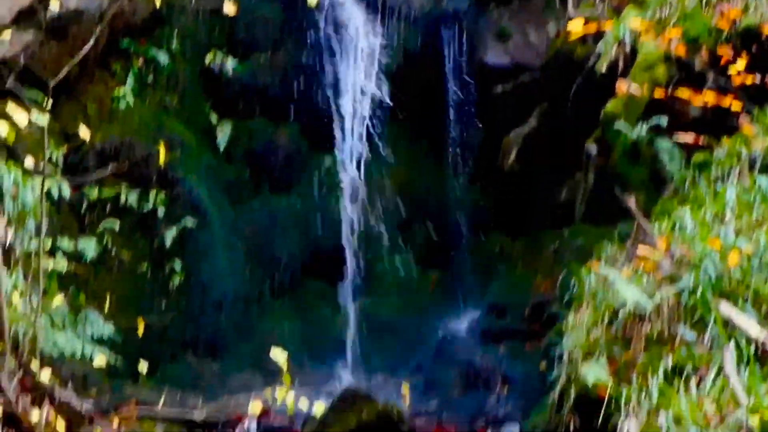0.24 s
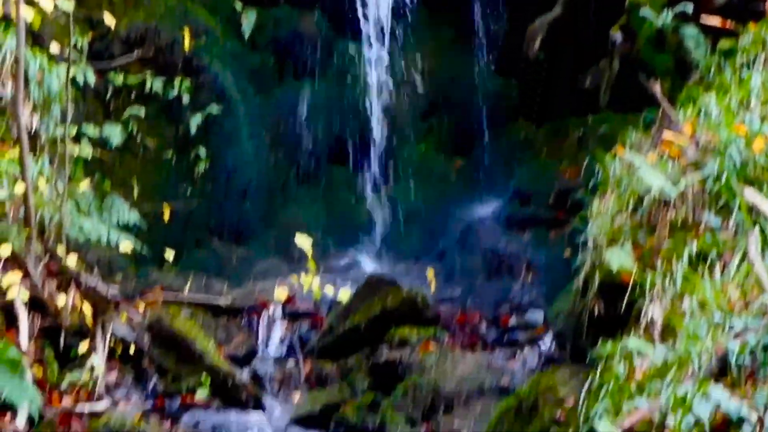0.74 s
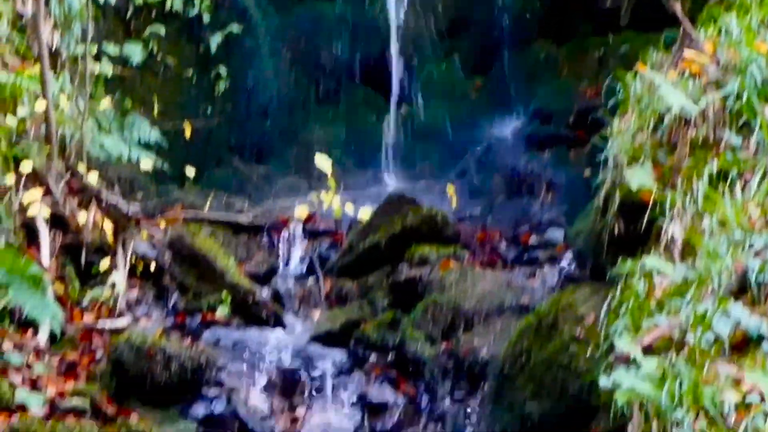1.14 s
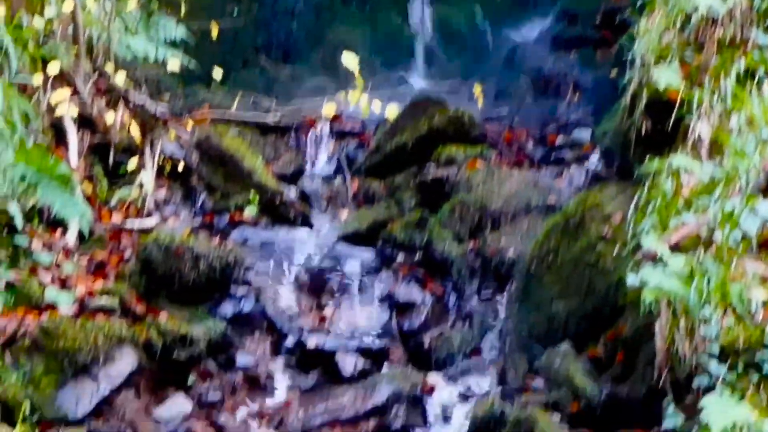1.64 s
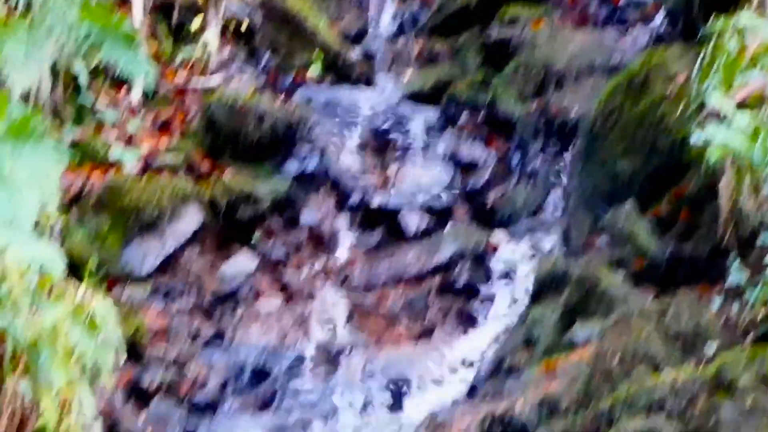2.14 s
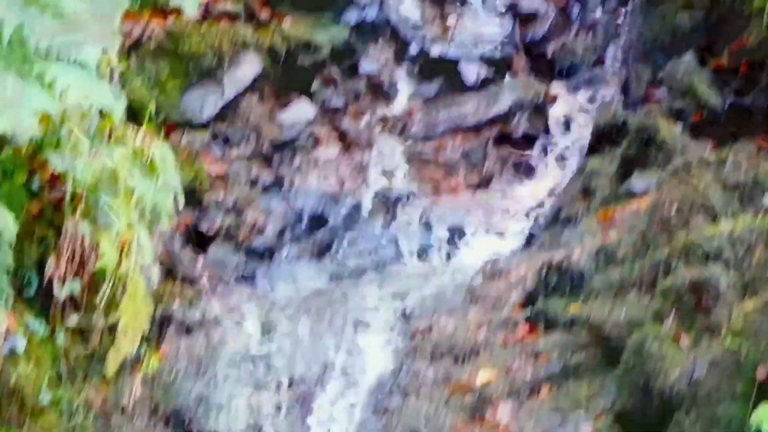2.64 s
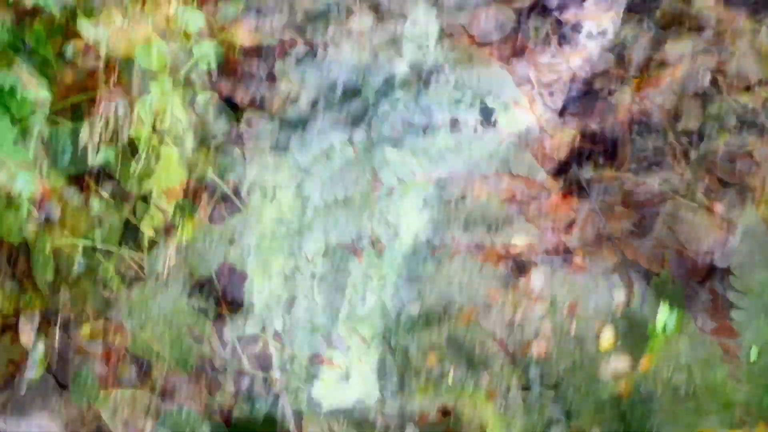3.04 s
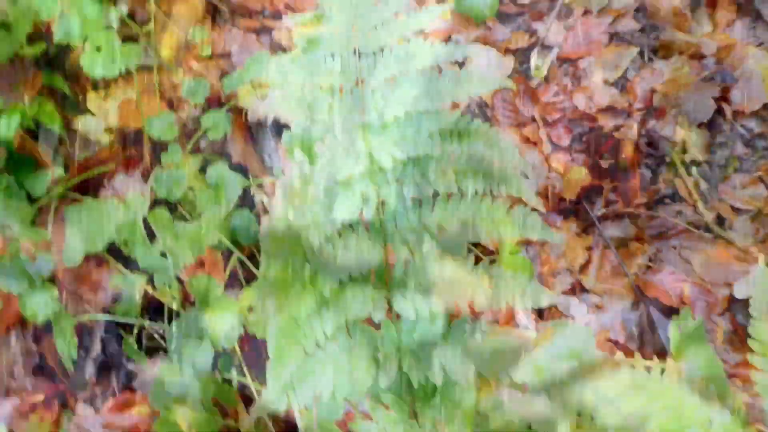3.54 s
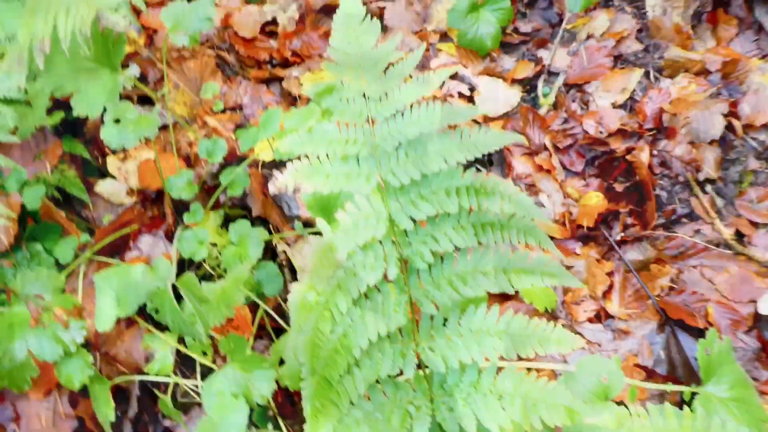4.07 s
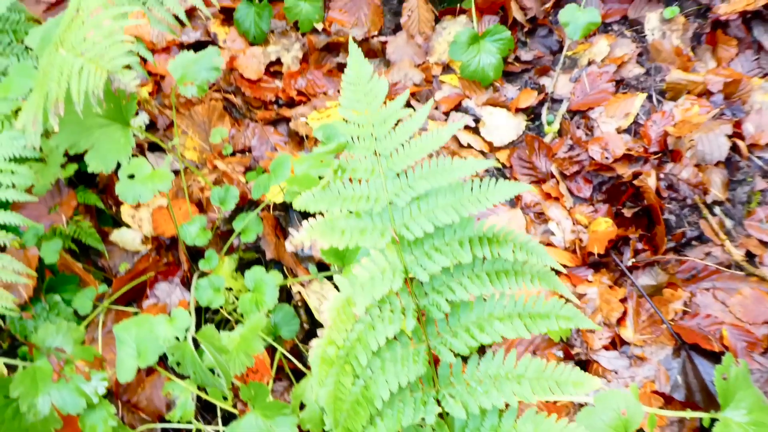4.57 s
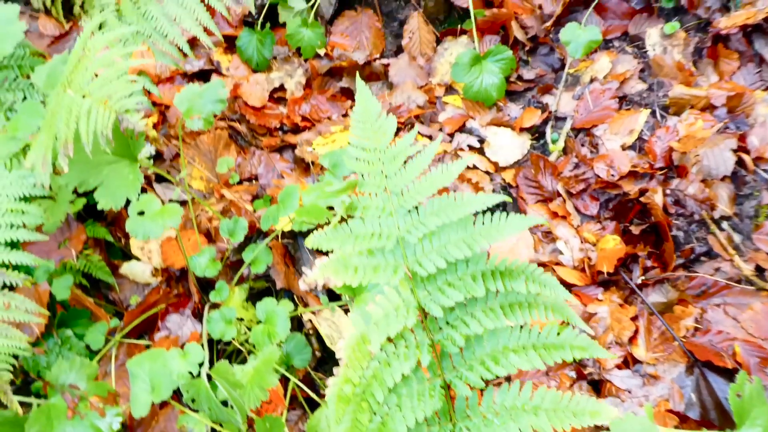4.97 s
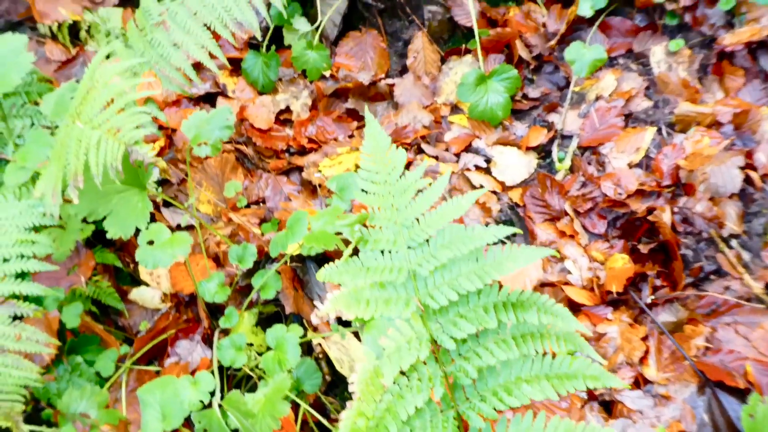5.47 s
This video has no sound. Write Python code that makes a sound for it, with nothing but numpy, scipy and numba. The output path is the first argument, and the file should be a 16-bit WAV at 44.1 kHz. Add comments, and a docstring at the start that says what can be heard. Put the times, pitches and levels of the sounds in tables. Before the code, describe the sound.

A small woodland waterfall splashes brightly over rock close by, bubbling and slapping, then fades smoothly into a much fainter, duller rush of water.

```python
"""A small woodland waterfall splashes down rock close by: bubbles over a patchy roar and spray hiss.
It fades evenly into the same water heard from farther off, fainter, duller and wider.
Each water bed is gain-modulated noise plus clouds of damped chirps, coloured and spread in stereo.
Brief, slightly rising tones, low to high, and slaps on stone (noise puffs) stand out of the water."""
import sys
import numpy as np
from scipy import signal
from scipy.fft import rfft, irfft, next_fast_len
from scipy.io import wavfile
from scipy.ndimage import uniform_filter1d, map_coordinates
from numba import njit

SR = 44100
rng = np.random.default_rng(int(sys.argv[2]) if len(sys.argv) > 2 else 0)


def unload_wav(signal):
    """Save mono or channel-first audio to the path in sys.argv[1] as 16-bit WAV at rate SR, clipped to [-1, 1]."""
    wavfile.write(
        sys.argv[1],
        SR,
        np.round(np.clip(np.atleast_2d(signal).T, -1, 1) * 32767).astype(np.int16),
    )


N = 251811


def amp(db):
    """Decibels to gain."""
    return 10 ** (np.asarray(db) / 20)


def unit(x):
    """Scaled to rms 1."""
    return x / np.sqrt(np.mean(x ** 2) + 1e-20)


def along(points, hz):
    """(Hz, value) points interpolated on a log frequency axis."""
    point_hz, value = np.transpose(points)
    return np.interp(np.log(hz + 1), np.log(point_hz + 1), value)


def wobble(knots_per_s):
    """Smooth random curve with no slow trend."""
    knots = np.diff(rng.standard_normal(int(N * knots_per_s / SR) + 5))
    return map_coordinates(unit(knots), [np.arange(N) * knots_per_s / SR])


def filtered(x, response):
    """x times a response of frequency in Hz, zero-padded against wrap-around."""
    m = next_fast_len(N + SR // 2)
    hz = np.fft.rfftfreq(m, 1 / SR)
    return irfft(rfft(x, m) * response(hz), m)[..., :N]


def bell_band(x, centre_hz, width_hz):
    """x through a Gaussian band; width_hz is the full width at 1/e gain."""
    return filtered(x, lambda hz: np.exp(-(2 * (hz - centre_hz) / width_hz) ** 2))


def leaned(x, left_over_right_db):
    """Mono to stereo, the level difference shared between the sides."""
    return amp(np.outer([.5, -.5], left_over_right_db)) * x


@njit
def chirps(start, step, size, cycles, rise, n):
    """Damped sines with a soft start and rising pitch; step is the first pitch in cycles per sample."""
    out = np.zeros(n)
    for i in range(len(start)):
        for j in range(min(int(4 * cycles / step[i]), n - start[i])):
            u = j * step[i] / cycles
            phase = 2 * np.pi * cycles * (u + rise * u * u / 2)
            out[start[i] + j] += size[i] * u * np.exp(-2 * u) * np.sin(phase)
    return out


def bubbles(count, low_hz, high_hz, cycles, rise, spread_db, clump_db):
    """Trapped air rings briefly and climbs in pitch as it nears the surface; splashes clump the bubbles."""
    when, where, luck = rng.random((count, 3)).T
    start = (when * N).astype(np.int64)
    clumps_db = clump_db * np.tanh(wobble(knots_per_s=30))
    hz = low_hz * (high_hz / low_hz) ** where
    # size rises with pitch: flat cloud spectrum
    size = hz * amp(spread_db * luck ** 3 + clumps_db[start])
    return unit(chirps(start, hz / SR, size, cycles, rise, N))


def roar(patchy_db, spray_db):
    """Two white noises in short patches of random gain; treble spray comes in broad flurries."""
    hz, _, z = signal.stft(rng.standard_normal((2, N)), SR, nperseg=256)

    def field(wide_bins, long_frames):
        """Random blobs with no slow trend: the flow itself is steady."""
        blobs = uniform_filter1d(rng.standard_normal(z.shape[1:]), wide_bins, 0)
        blobs = uniform_filter1d(blobs, long_frames, 1)
        return unit(blobs - uniform_filter1d(blobs, 70, 1))

    treble = (hz ** 2 / (hz ** 2 + 7000 ** 2))[:, None]
    patches_db = patchy_db * field(4, 14)
    flurries_db = spray_db * treble * field(30, 18)
    return unit(signal.istft(z * amp(patches_db + flurries_db), SR, nperseg=256)[1][:, :N])


def water(colour, alike, lean, bubble_db, fizz_db, patchy_db, spray_db, surge_db, clump_db, spread_db,
          patter_db):
    """Roar, bubbles, drop patter and fizz coloured by the rock basin, spread to two channels; rms 1."""
    source = roar(patchy_db, spray_db)
    for row in source:
        row += amp(bubble_db) * bubbles(count=5000, low_hz=349.0, high_hz=3690, cycles=8.3, rise=0.057,
                                        spread_db=spread_db, clump_db=clump_db)
        row += amp(patter_db) * bubbles(count=5000, low_hz=600, high_hz=4500, cycles=1.8, rise=0.05,
                                        spread_db=7, clump_db=2)
        row += amp(fizz_db) * bubbles(count=14000, low_hz=4190, high_hz=13100, cycles=4.3, rise=0.093,
                                      spread_db=18, clump_db=2.0)

    def mid_side_gain(hz):
        """Likeness sets the mid/side split at each frequency."""
        turn = np.arccos(np.clip(along(alike, hz), -1, 1)) / 2
        return amp(along(colour, hz)) * np.array([np.cos(turn), np.sin(turn)])

    mid, side = filtered(source, mid_side_gain)
    pair = np.array([mid + side, mid - side])
    pair = filtered(pair, lambda hz: leaned(1, along(lean, hz)))
    return unit(pair * amp(surge_db * wobble(knots_per_s=24)))


FADE_FROM_S, FADE_TO_S = 2.59, 4.31


def handover():
    """Straight line in amplitude: 0 with the near fall alone, 1 with the far rush alone."""
    return np.clip((np.arange(N) / SR - FADE_FROM_S) / (FADE_TO_S - FADE_FROM_S), 0, 1)


# far spectral colour: (frequency [Hz], relative gain [dB])
FAR_COLOUR = [(15, -80), (25, -46), (59, -26), (164, -12), (266, -6), (500, -2), (760, -2.5), (1100, -6.5),
              (1450, -3), (1850, -4.5), (2300, -8), (3100, -7), (4470, -8.5), (7800, -22), (9800, -26.5),
              (12000, -38), (15400, -48)]
# far stereo likeness: (frequency [Hz], left-right likeness [-1..1])
FAR_ALIKE = [(60, .08), (290, 0.27), (640, 0.36), (1400, 0.79), (3000, 0.84), (3500, 0.98), (4900, .97),
             (5600, 0.87), (9000, 0.39), (14900, .3)]
# far stereo balance: (frequency [Hz], left over right [dB])
FAR_LEAN = [(60, -4), (180, -1.5), (550, -2), (1640, -4), (4950, 0), (14900, -1)]
FAR_DB = -43  # rms before handover


def far_rush():
    """Water from behind the bank: shaded spray, bass arriving from all sides."""
    rush = water(FAR_COLOUR, FAR_ALIKE, FAR_LEAN, bubble_db=-14.0, fizz_db=-26, patchy_db=0.0, spray_db=0.5,
                 surge_db=0.15, clump_db=3.2, spread_db=2.5, patter_db=-18.5)
    return amp(FAR_DB) * handover() * rush


EVENT_LEAN_DB = -3.5  # slaps and tones, left over right
# slaps of water on stone: (time of peak [s], envelope peak before high-pass and lean [dB])
SLAPS = [(.012, -22.5), (.221, -32), (.345, -23), (.571, -26), (0.915, -28), (1.355, -29), (1.539, -22),
         (1.869, -27), (2.15, -23), (2.21, -22), (2.249, -24.5), (2.403, -28), (2.531, -23), (2.647, -22.5),
         (3.38, -31), (3.707, -29.5), (4.109, -40.5), (4.473, -44), (4.7, -44), (4.779, -42), (5.057, -44),
         (5.667, -45)]
SLAP_HZ, SLAP_WIDTH_HZ, SLAP_HIGHPASS_HZ, SLAP_RISE_S = 2400, 3000, 500, 0.0014


def slaps():
    """Each slap is a quick puff of band noise with the bass removed."""
    t = np.arange(N) / SR
    puffs = np.zeros(N)
    for peak_s, db in SLAPS:
        u = np.clip((t - peak_s) / SLAP_RISE_S + 1, 0, 40)
        puffs += amp(db) * u * np.exp(1 - u)
    hiss = unit(bell_band(rng.standard_normal(N), SLAP_HZ, SLAP_WIDTH_HZ))
    slap = filtered(puffs * hiss, lambda hz: hz ** 4 / (hz ** 4 + SLAP_HIGHPASS_HZ ** 4))
    return leaned(slap, EVENT_LEAN_DB)


# tones out of the water: (start [s], starting pitch [Hz], envelope peak before lean [dB], decay scale [s])
RISING_TONES = [(.028, 778, -29.5, 0.012), (.17, 706, -36, 0.018), (.675, 774, -31, 0.015),
                (1.685, 870, -25, 0.013), (1.863, 900, -28, .015), (2.205, 685, -30.5, .015),
                (2.283, 784, -30, 0.014), (2.33, 800, -28, 0.014), (2.447, 945, -29, .015),
                (.925, 497, -28, 0.0099), (.338, 950, -22.5, 0.0078), (.908, 2890, -32, 0.017),
                (1.052, 1510, -31, 0.017), (1.179, 3000, -28, 0.011), (1.345, 1560, -28, 0.012),
                (.215, 1646, -30.5, .014), (.264, 499, -31, 0.013), (.751, 665, -32, 0.023),
                (1.005, 774, -24, 0.0092), (1.205, 1073, -33, .016), (1.425, 755, -30, 0.013),
                (1.527, 2210, -29, 0.016), (1.554, 2840, -32, 0.009), (1.742, 1344, -27.5, 0.014),
                (1.861, 2870, -34, 0.015), (2.031, 665, -27.5, 0.013), (2.363, 1780, -29, .015),
                (2.418, 3270, -30, 0.015), (2.52, 1260, -30, 0.0096), (2.537, 2720, -30, 0.012),
                (2.749, 930, -31, 0.01), (3.156, 273, -41, 0.023), (3.281, 2270, -38, .014),
                (3.376, 2670, -33, 0.011), (3.459, 670, -31, 0.014), (3.841, 2750, -43, .014),
                (4.601, 2085, -49, .014), (4.73, 760, -47, .018), (4.695, 1750, -48, .014),
                (4.945, 1700, -46, .018), (4.938, 800, -50, 0.014), (5.025, 2630, -50, .014),
                (5.478, 1770, -44, .015), (5.536, 2620, -51, .014), (5.553, 2385, -49, .014),
                (2.8, 528, -29.5, 0.022), (2.842, 2000, -28, 0.0086), (5.03, 587, -53, .02),
                (5.205, 1500, -43, 0.027), (5.27, 673, -48, 0.012), (5.547, 244, -45.5, 0.014)]


def rising_tones():
    """Brief, slightly rising tones, low to high, each swelling softly out of the water and dying away."""
    out, t = np.zeros((2, N)), np.arange(N) / SR
    for start_s, hz, db, life_s in RISING_TONES:
        u = np.clip(t - start_s, 0, None) / life_s
        swell = 2 * np.e * u * np.exp(-2 * u)  # peak 1 at half a life
        tone = swell * np.sin(2 * np.pi * hz * life_s * (u + 0.0168 * u * u))
        out += leaned(amp(db) * tone, EVENT_LEAN_DB)
    return out


# near spectral colour: (frequency [Hz], relative gain [dB])
NEAR_COLOUR = [(15, -75), (25, -47), (43, -40), (107, -20), (155, -18), (203, -8.5), (468, -4), (779, -3.5),
               (1530, -4.5), (2830, -4.5), (5690, -13), (7000, -17), (8000, -20), (10000, -18.5),
               (14200, -32), (15400, -36)]
# near stereo likeness: (frequency [Hz], left-right likeness [-1..1])
NEAR_ALIKE = [(30, .05), (99, 0.47), (160, 0.87), (450, 0.77), (740, 0.94), (2010, .9), (3000, 0.98),
              (4000, 0.99), (7300, .999), (7800, 0.78), (10000, 0.62), (14900, .4)]
# near stereo balance: (frequency [Hz], left over right [dB])
NEAR_LEAN = [(60, -3), (180, -4), (550, -3), (1640, -2), (2800, -3), (4000, -0.5), (7300, 0), (8000, -1),
             (14900, 0.7)]
# ringing hollows among the rocks: (frequency [Hz], width [Hz], relative lift [dB])
HOLLOWS = [(280, 20, 1.5), (765, 58, 2), (2730, 270, 1.5)]
# bright splash band: (time [s], level [dB])
SPLASH = [(0, -3.5), (.3, -1), (1.4, -1.4), (2.1, -0.5), (2.5, -0.5), (2.9, -0.5), (3.5, -1), (3.9, 0),
          (4.3, -1)]
SPLASH_HZ, SPLASH_WIDTH_HZ = 2840, 1600
GURGLE_HZ, GURGLE_WIDTH_HZ, GURGLE_SURGE_DB = 544, 700, 0.87
RUMBLE_TOP_HZ, RUMBLE_SURGE_DB = 170, 3
LULL_S, LULL_HALF_WIDTH_S, LULL_DB = 2.88, 0.36, -1.5  # one sag during the fade
NEAR_DB = -25.5  # rms before lull and handover


def near_fall():
    """Bright, narrow fall, leaning right below about 3 kHz; splash, gurgle and rumble vary separately."""
    fall = water(NEAR_COLOUR, NEAR_ALIKE, NEAR_LEAN, bubble_db=-15.0, fizz_db=-9.5, patchy_db=0.73,
                 spray_db=0.3, surge_db=0.12, clump_db=2.5, spread_db=4.5, patter_db=-14)
    t = np.arange(N) / SR
    splash_gain = amp(np.interp(t, *np.transpose(SPLASH)))
    gurgle_gain = amp(GURGLE_SURGE_DB * wobble(knots_per_s=7))
    rumble_gain = amp(RUMBLE_SURGE_DB * wobble(knots_per_s=4))

    # band * (gain - 1) added back re-levels that band alone
    splash = (splash_gain - 1) * bell_band(fall, SPLASH_HZ, SPLASH_WIDTH_HZ)
    gurgle = (gurgle_gain - 1) * bell_band(fall, GURGLE_HZ, GURGLE_WIDTH_HZ)
    fall = fall + splash + gurgle
    fall = fall + (rumble_gain - 1) * bell_band(fall, 0, 2 * RUMBLE_TOP_HZ)

    def hollow_gain(f):
        """Resonant lifts, summed in dB."""
        return amp(sum(db / (1 + (2 * (f - hz) / width_hz) ** 2) for hz, width_hz, db in HOLLOWS))

    lull_db = LULL_DB * np.exp(-((t - LULL_S) / LULL_HALF_WIDTH_S) ** 2)
    return amp(NEAR_DB + lull_db) * (1 - handover()) * unit(filtered(fall, hollow_gain))


def scene():
    """Far rush, slaps, rising tones and near fall."""
    return far_rush() + slaps() + rising_tones() + near_fall()


TOP_HZ = 15300


def record(dry):
    """Sharp band limit: nothing above TOP_HZ is kept."""
    return filtered(dry, lambda hz: hz < TOP_HZ)


dry = scene()
out = record(dry)
unload_wav(out)
```